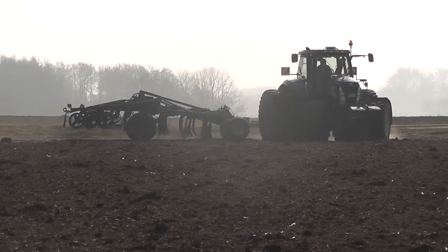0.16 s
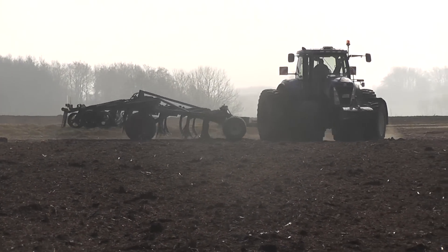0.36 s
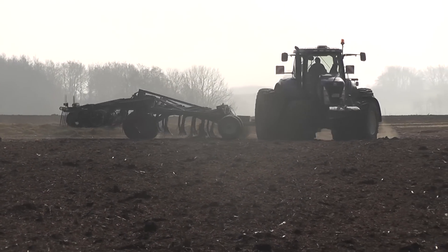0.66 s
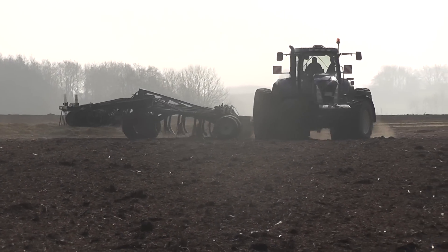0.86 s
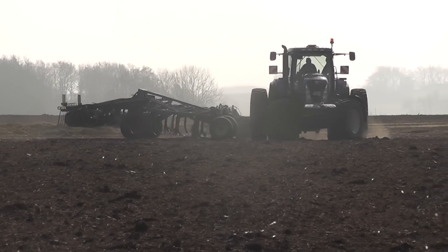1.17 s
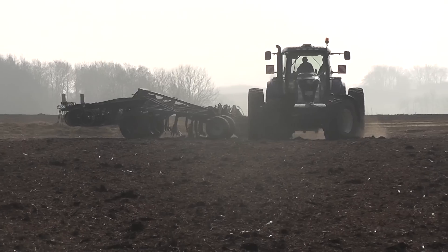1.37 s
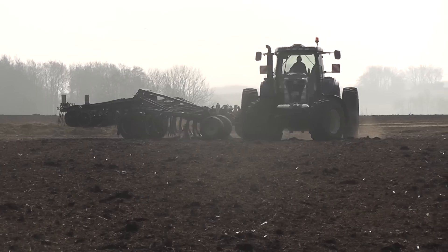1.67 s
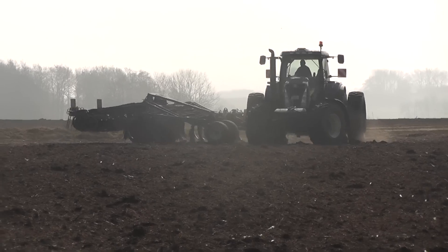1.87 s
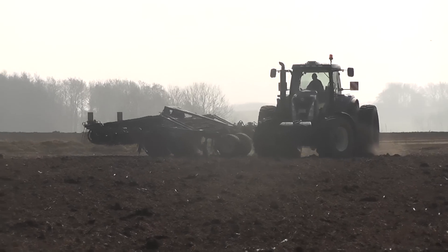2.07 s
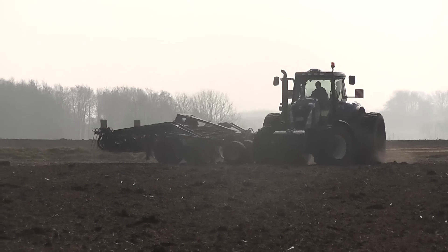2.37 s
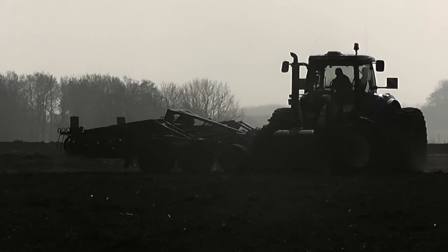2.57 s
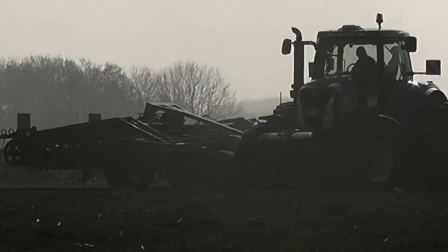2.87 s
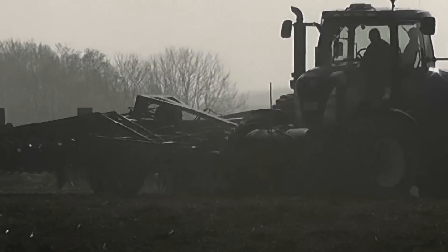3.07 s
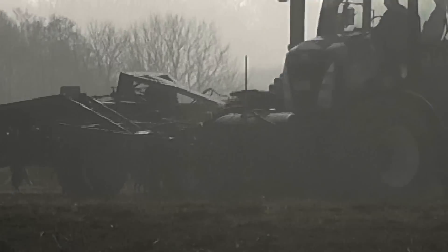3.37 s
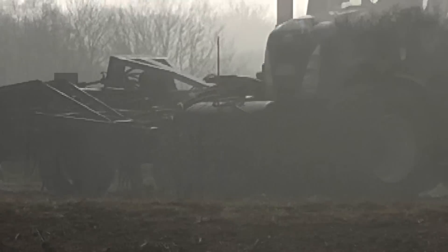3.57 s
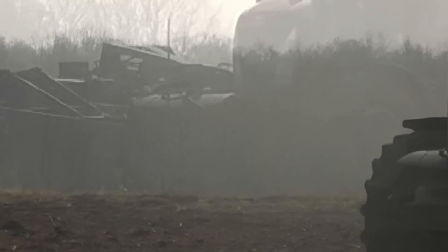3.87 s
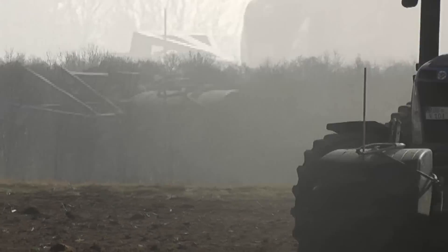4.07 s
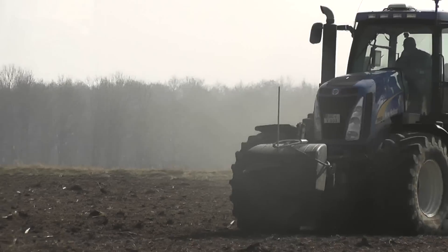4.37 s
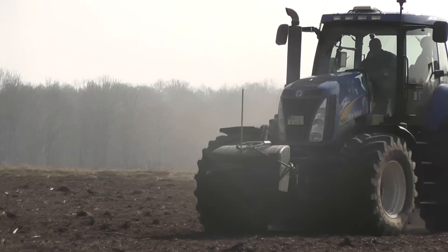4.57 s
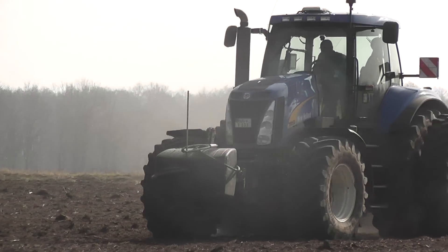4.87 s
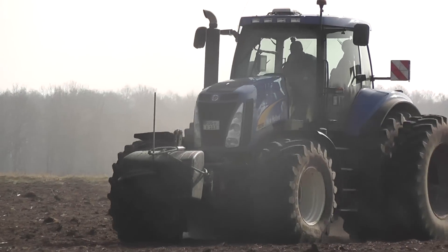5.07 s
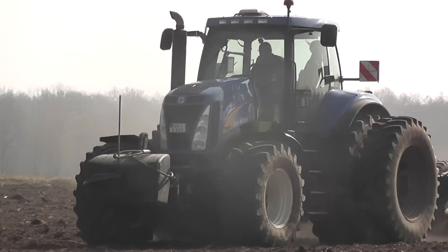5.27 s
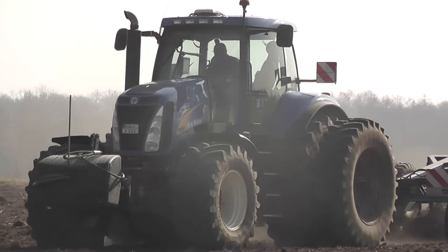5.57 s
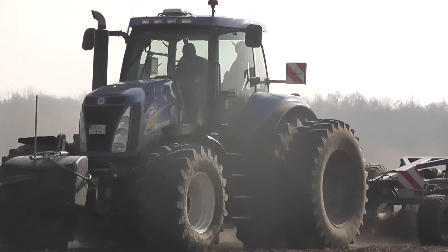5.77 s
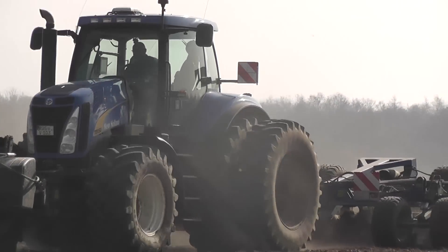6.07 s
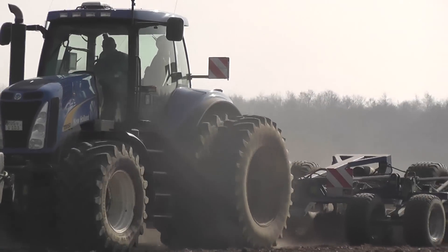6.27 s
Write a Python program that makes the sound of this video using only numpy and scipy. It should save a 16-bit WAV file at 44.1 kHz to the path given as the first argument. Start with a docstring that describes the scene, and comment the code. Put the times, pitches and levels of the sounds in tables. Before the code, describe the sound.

In an open field, a distant tractor drones low and unevenly over a rattling wash, with airy chuffs and faint whistles. From about two and a half seconds it dissolves evenly into a much louder close view: steady diesel firing, block clatter, pulsing hiss, thin turbo whine, tyre rumble and crackling dry soil. Stereo outdoor pickup, distant then near, with no audible cut.

```python
"""A diesel tractor pulls a cultivator through dry soil, first across the field, then close to the microphones.
Far off, a drone of sines sags with the load over rattling noise, while each beat puffs hiss and whistle.
The distant sound then dissolves evenly into the close one: firing note and fan as sines, clatter as noise
ringing in the block, pulsing hiss, the resonant noise of piping and a flaring turbo, tyre rumble as
low noise and crumbling soil as random snaps."""
import sys
import numpy as np
from scipy import signal
from scipy.fft import rfft, irfft
from scipy.io import wavfile

SR = 44100
rng = np.random.default_rng(int(sys.argv[2]) if len(sys.argv) > 2 else 0)


def dump(signal):
    """Clip the signal to [-1, 1] and save it as 16-bit WAV at the path in sys.argv[1]."""
    limited = np.clip(np.atleast_2d(signal).T, -1, 1)
    pcm = np.round(limited * 32767).astype(np.int16)
    wavfile.write(sys.argv[1], SR, pcm)


N = 282681
TIME = np.arange(N) / SR
FREQS = np.fft.rfftfreq(N, 1 / SR)

# rough stereo width used for the close sounds, almost mono around 6.5 kHz: hz, side_against_mid_db
ROUGH_WIDTH = [(40, -10), (130, -3.5), (230, -5.5), (330, -3.5), (450, -3), (650, -15.5), (1050, -23.5),
               (1900, -23), (2300, -15), (2900, -16), (4000, -27), (6500, -75), (10000, -23), (14000, -26)]
# the distant tractor dissolves into the close one
DISSOLVE_START_S, DISSOLVE_S = 2.545, 1.876
FAN_RATIO = 13 / 3  # fan blades passing per firing or far beat
FIRINGS_PER_CYCLE = 6


def gain_of(db):
    """Decibels to gain."""
    return 10 ** (np.asarray(db) / 20)


def evened(x):
    """Scales to rms 1."""
    return x / np.sqrt(np.mean(x ** 2) + 1e-20)


def curves(rows):
    """Each column of a table, joined by straight lines in time."""
    s, *columns = np.transpose(rows)
    return [np.interp(TIME, s, c) for c in columns]


def drift(value, per_s):
    """A steady change that passes the value when the tractor is fully close."""
    return value + per_s * (TIME - DISSOLVE_START_S - DISSOLVE_S)


def wander(hz):
    """Slow chance up to about the given rate; rms 1."""
    spectrum = rfft(rng.standard_normal(N)) * np.exp(-(FREQS / hz) ** 2)
    return evened(irfft(spectrum, N))


def read(points):
    """A spectrum table on a log-frequency axis."""
    hz, value = np.transpose(points)
    return np.interp(np.log(FREQS + 1), np.log(hz + 1), value)


def colour(x, points):
    """Filters by a spectrum that falls away steeply past its ends; rms 1."""
    low_skirt = np.minimum(FREQS / points[0][0], 1) ** 2
    high_skirt = np.minimum(points[-1][0] / (FREQS + 1), 1) ** 6
    return evened(irfft(rfft(x) * gain_of(read(points)) * low_skirt * high_skirt, N))


def noise_pair(width):
    """White noise at two microphones, as wide as the table says."""
    mid, side = rfft(rng.standard_normal((2, N)))
    side = side * gain_of(read(width))
    return irfft([mid + side, mid - side], N)


def tone(turns):
    """A sine of rms 1."""
    return np.sqrt(2) * np.sin(2 * np.pi * turns)


def resonate(x, hz, width):
    """A resonance of gain 1 that may follow a frequency curve: shift to zero, smooth, shift back."""
    turn = np.exp(2j * np.pi * np.cumsum(hz * np.ones(N)) / SR)
    r = np.exp(-np.pi * width / SR)
    return 2 * (turn * signal.lfilter([1 - r], [1, -r], x / turn)).real


def breathy_whistle(hz, width):
    """Noise through two equal resonances, a pitch with breath in it; rms 1."""
    once = resonate(rng.standard_normal(N), hz, width)
    return evened(resonate(once, hz, width))


def gate(turns, sharp):
    """One smooth puff on each whole turn; rms 1."""
    return evened(np.exp(sharp * np.cos(2 * np.pi * turns)))


def grains(per_s, spread_db, decay_s):
    """Random short snaps, most small and a few large; rms 1."""
    size = gain_of(spread_db * np.minimum(rng.exponential(1, N), 4))
    snaps = size * rng.choice([-1, 1], N) * (rng.random(N) < per_s / SR)
    burst = rng.standard_normal(size=300) * np.exp(-TIME[:300] / decay_s)
    return evened(signal.oaconvolve(snaps, burst)[:N])


def placed(pair, tilt):
    """Leans each band of a stereo pair to the left or right."""
    return irfft(rfft(pair) * gain_of(np.outer([.5, -.5], read(tilt))), N)


def exhaust(turns):
    """The firing note and its octave, side lines from unequal cylinders, and the cooling fan."""
    # lines from unequal cylinders: multiple_of_cycle, level_db (before the common uneven_db)
    uneven_lines = [(7, -22), (9, -20), (10, -17.5), (11, -16.5), (14, -21.5), (16, -20.5), (18, -24),
                    (19, -20.5), (24, -24), (34, -31.5), (38, -28)]
    note_db, octave_db, uneven_db, fan_db = -22.5, -26, -23.5, -39
    note = gain_of(note_db + 0.6 * wander(16)) * tone(turns)
    octave = gain_of(octave_db + 0.76 * wander(15)) * tone(2 * turns)
    cycle = turns / FIRINGS_PER_CYCLE
    uneven = 0
    for k, db in uneven_lines:
        phase = rng.random() + 0.059 * wander(4.6)
        uneven = uneven + gain_of(db + 2.1 * wander(9.8)) * tone(round(k) * cycle + phase)
    blades = turns * FAN_RATIO + 0.047 * wander(17)
    fan = gain_of(drift(fan_db, per_s=1.53) + 1.16 * wander(6.4)) * tone(blades)
    return note + octave + gain_of(uneven_db) * uneven + fan


def clatter(turns, repeat):
    """Valves and pistons rattle the block; part of the rattle comes back in every engine cycle."""
    # spectrum of the rattle: hz, level_db (per Hz)
    rattle_colour = [(250, -37), (420, -4.5), (444, -8), (529, -4.5), (563, -1), (610, -4.5), (709, -1),
                     (845, -6.5), (1110, 0), (1410, -3), (1670, -1), (1800, -3.5), (2020, -7.5), (2300, -7),
                     (2800, -21), (3640, -42), (6160, -120)]
    # block and panel modes: hz, width_hz, level_db (before the ring towards the listener)
    block_modes = [(571, 21, -13.5), (1210, 52, -16), (1840, 61, -1.5)]
    # how much the panels ring towards the listener: time_s, level_db
    panel_ring = [(2.6, 8), (3.3, 3), (4, -0.5), (5.3, 7), (6.4, -10)]
    level_db = -26.5
    cycle = turns / FIRINGS_PER_CYCLE % 1
    pattern = rng.standard_normal(size=2970)
    repeated = pattern[(cycle * len(pattern)).astype(int)]
    share = np.clip(repeat, 0, 1)
    rattle = np.sqrt(share) * repeated + np.sqrt(1 - share) * noise_pair(ROUGH_WIDTH)
    pulsed = rattle * gate(turns - .3, sharp=0.069) * gate(cycle, sharp=0.014)
    rattle = colour(pulsed, rattle_colour)
    ring_db, = curves(panel_ring)
    ring = sum(gain_of(db) * resonate(rattle, hz, width) for hz, width, db in block_modes)
    return gain_of(level_db + 0.5 * wander(17)) * evened(rattle + gain_of(ring_db) * ring)


def air_path(turns):
    """Hiss and brighter fizz that pulse with each firing, and a thin ring of piping."""
    # spectrum of the hiss: hz, level_db (per Hz)
    hiss_colour = [(2000, -13), (2800, -11), (3200, -3), (3850, -1), (4500, -6), (5100, -12), (6500, -17)]
    # spectrum of the fizz: hz, level_db (per Hz)
    fizz_colour = [(4000, -21), (5300, 0), (6100, 1.5), (8000, -1), (9000, -3.5), (11400, -11),
                   (12800, -18), (14000, -33), (15500, -48)]
    # level of the fizz close by: time_s, level_db
    treble = [(3.3, -35.5), (4.25, -43), (4.65, -34.5), (4.85, -40), (5.0, -36), (5.5, -38), (6.4, -35)]
    # the ground echo cancels a band that sinks as the tractor nears: time_s, dip_hz
    hollow = [(2.6, 7000), (4.3, 6600), (5.3, 5430), (6.4, 5050)]
    hiss_db, piping_db, piping_hz = -31.5, -49.5, 8200
    hiss = colour(noise_pair(ROUGH_WIDTH), hiss_colour) * gate(turns - .8, sharp=0.049)
    hiss = gain_of(hiss_db + 0.79 * wander(18)) * hiss

    treble_db, = curves(treble)
    hollow_hz, = curves(hollow)
    fizz = colour(noise_pair(ROUGH_WIDTH), fizz_colour)
    # a bright band that sinks slowly
    fizz = fizz + 0.57 * resonate(fizz, drift(7040, per_s=-190), 1200)
    # two dips of the echo's comb
    fizz = fizz - 0.58 * resonate(fizz, hollow_hz, 700) - 0.33 * resonate(fizz, 1.56 * hollow_hz, 900)
    fizz = evened(fizz) * gate(turns - .8, sharp=0.28) * gain_of(treble_db + 1.14 * wander(22))

    piping = breathy_whistle(piping_hz, 130)
    return hiss + fizz + piping * gain_of(drift(piping_db, per_s=-1.5) + 2.0 * wander(17))


def turbo():
    """A breathy whine, noise in a narrow resonance, that wavers and now and then flares."""
    # turbo speed: time_s, whine_hz
    speed = [(2.7, 11620), (3.5, 11500), (4.7, 11520), (5.4, 11710), (6.4, 11510)]
    # flares of the whine: time_s, half_length_s, rise_db
    flares = [(3.45, 0.2, 4.5), (5.35, 0.094, 8), (5.75, 0.13, 7)]
    level_db = -54
    hz, = curves(speed)
    flare_db = sum(db * np.exp(-((TIME - s) / half_s) ** 2) for s, half_s, db in flares)
    return breathy_whistle(hz, 110) * gain_of(level_db + flare_db + 1.9 * wander(7))


def far_engine(turns, speed_hz):
    """Low drone, fan hum and gear whine over the rattling wash of the machine, blurred by moving air."""
    # drone: multiple_of_beat, level_db (at cruise), gain_db_per_hz of speed
    orders = [(1, -57, 0.8), (2, -52.5, 2.2), (3, -48.5, 0.2), (4, -66, 2), (5, -65, 1.5)]
    # gear whine: time_s, pitch_hz, level_db
    gear_whine = [(0.3, 620, -73), (0.85, 632, -57.5), (1.6, 645, -62.5), (1.85, 646, -54.5),
                  (2.15, 648, -69)]
    # spectra of the wash and the rumble: hz, level_db (per Hz)
    wash_colour = [(190, -41), (330, -13), (419, -12.5), (596, -3), (635, -5.5), (820, -5.5), (1040, -5.5),
                   (1280, -6.5), (1880, -6.5), (3290, -16), (3990, -15), (4980, -21.5), (6330, -25),
                   (9900, -39), (15000, -46)]
    rumble_colour = [(20, -28), (45, -8), (80, -3.5), (170, -2.5), (260, -4.5), (340, -12), (520, -32.5)]
    # ringing steelwork: hz, width_hz, level_db
    steel_modes = [(734, 60, -5), (1000, 110, -7), (2970, 140, -2.5), (3990, 300, 0.5), (8230, 620, 4)]
    # stereo width: hz, side_against_mid_db
    far_width = [(40, -3), (130, -8), (200, -12.5), (420, -3.5), (650, -8.5), (1700, -14), (2800, -12.5),
                 (4500, -41), (8500, -31), (11000, -2)]
    cruise_hz = 45.4  # drone and fan take their plain levels at this beat
    excess_hz = speed_hz - cruise_hz
    drone = 0
    for k, db, db_per_hz in orders:
        level_db = db + db_per_hz * excess_hz + 1.3 * wander(6)
        drone = drone + gain_of(level_db) * tone(k * turns + rng.random())

    # the body shades the fan until the tractor turns to face the listener
    facing_s, turning_s = 1.25, 0.2
    shade_db = -8 * np.clip((facing_s - TIME) / turning_s, 0, 1)
    rise_db = 3.0 * np.minimum(TIME, DISSOLVE_START_S)
    fan_db = -57.5 + shade_db + 1.5 * excess_hz + rise_db
    fan = gain_of(fan_db + 1.2 * wander(8.7)) * tone(turns * FAN_RATIO)

    gear_hz, gear_db = curves(gear_whine)
    gear_turns = np.cumsum(gear_hz + 1.5 * wander(10)) / SR
    gear = tone(gear_turns) * gain_of(gear_db + 1.5 * wander(9.7))

    rumble = gain_of(-48.5) * colour(noise_pair(far_width), rumble_colour)
    rattle = 0.26 * grains(per_s=500, spread_db=2.2, decay_s=0.0025)
    wash = colour(noise_pair(far_width) + rattle, wash_colour)
    ring = sum(gain_of(db) * resonate(wash, hz, width) for hz, width, db in steel_modes)
    wash_db = -47.5 - 0.5 * TIME + 0.77 * wander(30)
    return drone + fan + gear + rumble + gain_of(wash_db) * evened(wash + ring)


def far_chuff(turns, crest_s, rise_turns):
    """Each beat forces out a puff of hiss, quick to rise and slower to fall, and a pip of whistle."""
    # force of the chuffing air: time_s, crest_db (before the spread between puffs)
    force = [(0.55, -71), (0.9, -52.5), (1.65, -50), (1.92, -56.5), (2.15, -38.5), (2.29, -48), (2.55, -60)]
    # spectrum of the puffs: hz, level_db (per Hz)
    puff_colour = [(1500, -7), (2900, 0), (3400, -3.5), (4100, 1.5), (5200, 1), (5800, -14), (8300, -14),
                   (10000, -40), (14000, -45)]
    # pipping whistle of the distant air path: time_s, pitch_hz, level_db
    air_whistle = [(0.6, 6200, -79), (0.92, 6170, -65), (1.35, 6200, -62), (1.85, 6540, -74),
                   (2.4, 6900, -64.5), (2.8, 6900, -65)]
    soft_db, hard_db, spread_db = -52, -40, 2.0
    hiss_db, = curves(force)
    whistle_hz, whistle_db = curves(air_whistle)
    beat = turns - np.interp(crest_s, TIME, turns)
    puff, since = np.divmod(beat + rise_turns, 1)
    age = since / rise_turns
    # soft puffs run together, hard ones stand apart
    sharp = np.interp(hiss_db, [soft_db, hard_db], [.55, 1.5])
    shape = (age * np.exp(1 - age)) ** sharp
    force_db = hiss_db + spread_db * rng.standard_normal(N)[puff.astype(int)]
    hiss = gain_of(force_db) * shape * colour(rng.standard_normal(N), puff_colour)
    whistle = breathy_whistle(whistle_hz, 330) * gate(beat, sharp=0.75)
    return hiss + gain_of(whistle_db) * whistle


def ground():
    """Tyres and tines rumble through the field while dry clods snap."""
    # spectrum of the rumble: hz, level_db (per Hz)
    rumble_colour = [(20, -34), (45, -14.5), (75, -8), (110, 0), (160, -3.5), (230, -6), (285, -3.5),
                     (340, -14), (450, -24), (800, -41)]
    soil_colour = [(900, -9), (2000, -3), (4000, 3.5), (8000, -11.0), (12000, -26)]  # hz, level_db (per Hz)
    rumble_db, soil_db = -29, -42.5
    rumble = colour(noise_pair(ROUGH_WIDTH), rumble_colour)
    rumble = gain_of(drift(rumble_db, per_s=1.2) + 1.04 * wander(7.2)) * rumble
    soil = colour(grains(per_s=200, spread_db=4.5, decay_s=0.00073), soil_colour)
    return rumble + gain_of(drift(soil_db, per_s=-0.5)) * soil


def scene():
    """The distant tractor dissolves into the close one."""
    # far engine speed, sagging and recovering with the load: time_s, beat_hz
    far_speed = [(0.0, 46.06), (0.52, 45.6), (0.66, 44.1), (1.05, 43.7), (1.35, 47.6), (1.55, 44.45),
                 (1.74, 45.33), (2.05, 43.76), (2.21, 46.65), (2.35, 48.25), (2.6, 47.74)]
    # near engine speed, held by the governor as the draught varies: time_s, firing_hz
    near_speed = [(2.8, 89.54), (3.9, 89.78), (4.3, 88.65), (4.55, 89.53), (4.9, 88.28), (5.3, 89.24),
                  (5.6, 88.92), (6.0, 90.06), (6.4, 88.57)]
    # stereo lean of the far and the near sounds: hz, left_minus_right_db
    far_tilt = [(60, -1.0), (130, -2), (290, -0.5), (640, -2.5), (1410, -0.5), (3100, -1.0), (6820, 0.5),
                (15000, 0.5)]
    near_tilt = [(60, -0.2), (130, 0.6), (230, -1.1), (335, -1.5), (560, 0), (800, -0.7), (1600, .2),
                 (2200, 0), (2950, -2.5), (4200, 0)]
    far_hz, = curves(far_speed)
    far_turns = np.cumsum(far_hz) / SR
    far = far_engine(far_turns, far_hz) + far_chuff(far_turns, crest_s=2.154, rise_turns=0.1)

    firing_hz, = curves(near_speed)
    turns = np.cumsum(firing_hz) / SR + .008 * wander(25)  # firings come a little early or late
    near = exhaust(turns) + clatter(turns, repeat=0.29) + air_path(turns) + turbo() + ground()

    close = np.clip((TIME - DISSOLVE_START_S) / DISSOLVE_S, 0, 1)
    return (1 - close) * placed(far, far_tilt) + close * placed(near, near_tilt)


def record(dry):
    """The recorder's band limit, a steep low-pass."""
    edge_hz = 15600
    low_pass = signal.firwin(511, edge_hz, window=("kaiser", 9), fs=SR)
    return signal.oaconvolve(dry, low_pass[None], "same")


dry = scene()
out = record(dry)
dump(out)
```